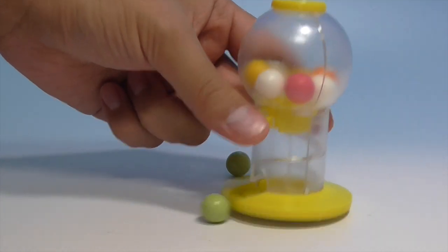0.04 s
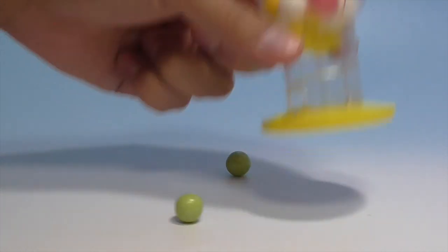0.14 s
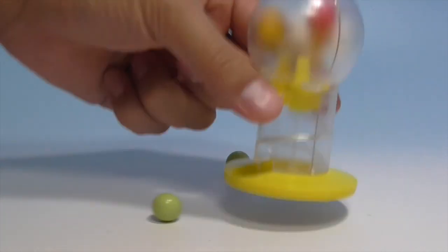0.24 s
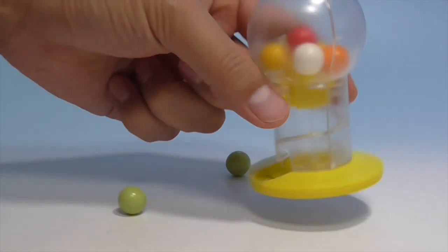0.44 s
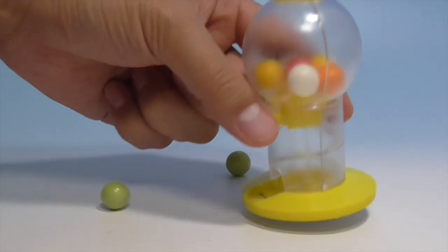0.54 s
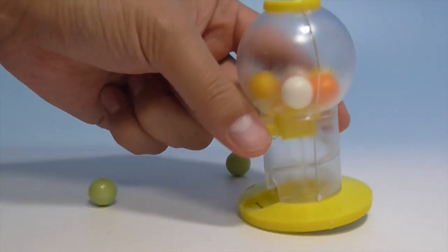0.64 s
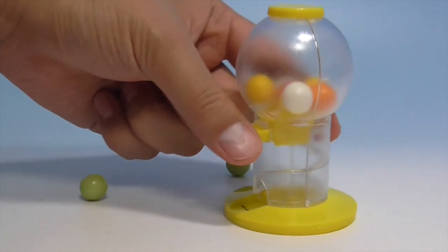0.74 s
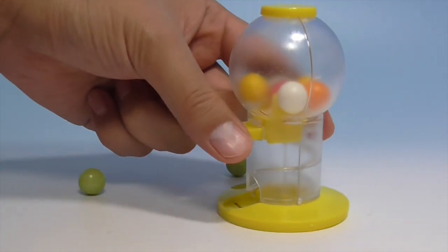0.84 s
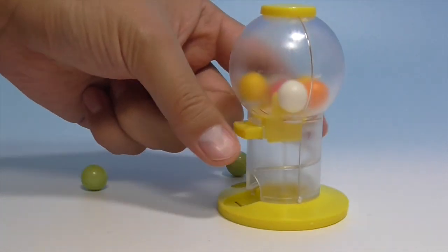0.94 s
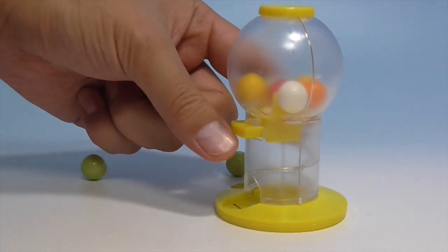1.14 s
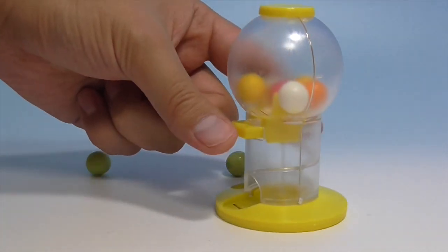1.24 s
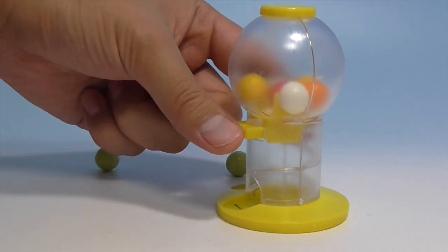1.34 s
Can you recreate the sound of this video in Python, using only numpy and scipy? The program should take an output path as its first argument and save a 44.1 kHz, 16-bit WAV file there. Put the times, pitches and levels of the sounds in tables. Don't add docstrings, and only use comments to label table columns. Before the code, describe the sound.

Brief bright plastic rattle of little balls shaken in a hollow globe, then soft table knocks

```python
import sys
import numpy as np
from scipy import signal
from scipy.fft import rfft, irfft
from scipy.io import wavfile

SR = 44100
rng = np.random.default_rng(int(sys.argv[2]) if len(sys.argv) > 2 else 0)


def wav_out(sig):
    wavfile.write(sys.argv[1], SR, np.round(np.clip(np.atleast_2d(sig).T, -1, 1) * 32767).astype(np.int16))


def rack_gain(trim_db):
    fader = np.asarray(trim_db, float)
    return 10 ** (fader / 20)


N = 61739
TAIL = 8192

# pitch [Hz], level [dB], t60 [s].
GLOBE = [(1683, -2.5, 0.029), (1880, 4, 0.019), (2050, -23.5, 0.03), (3110, -8, 0.069), (3882, 5, 0.017),
         (4012, 0.5, 0.019), (4500, 7, 0.02), (4540, -21.5, 0.013), (1144, -19, .012)]
GLOBE_LOW_HZ = 483


def curve(points, at):
    hz, db = np.array(points, float).T
    return np.interp(np.log(at + 1), np.log(hz), db)


def thin(x, low_hz):
    return signal.sosfilt(signal.butter(N=6, Wn=low_hz, btype="high", fs=SR, output="sos"), x)


def ring(hz, db, t60, turn):
    bloom_s = 0.00041
    t = np.arange(min(TAIL, int(1.2 * t60.max() * SR))) / SR
    sines = np.sin(2 * np.pi * (hz[:, None] * t + turn[:, None]))
    decays = np.exp(-np.log(1000) * t / t60[:, None])
    y = (rack_gain(db)[:, None] * sines * decays).sum(0)
    y = y * (1 - np.exp(-(t / bloom_s) ** 2))
    return y / np.abs(y).max()


def cluster(modes, chance, detune, scatter_db):
    hz, db, t60 = np.repeat(np.array(modes), 3, axis=0).T
    pitch_draw, level_draw = chance[:, :len(hz)]
    return ring(hz * (1 + detune * pitch_draw), db + scatter_db * level_draw, t60, 0 * hz)


def strike(body, noise, rise_s, fall_s):
    t = np.arange(len(noise)) / SR
    scrape = noise * (1 - np.exp(-t / rise_s)) * np.exp(-t / fall_s)
    y = signal.fftconvolve(scrape, body)
    return y / np.abs(y).max()


def add(out, s, y):
    i = int(s * SR)
    out[i:i + len(y)] += y[:N - i]


def globe(chance, own_hz, own_db=12):
    # pitch [Hz], level [dB], t60 [s].
    cavity_modes = [(678.8, -4, 0.096), (756, 8.5, 0.0098)]
    detune, scatter_db = 0.032, 3
    own_t60_s, shell_t60_s = 0.016, 0.007
    draws = chance.reshape(6, -1)
    count = draws.shape[1]
    is_own = np.arange(count) // 3 == len(GLOBE)
    draws = draws * np.where(is_own, 0.3, 1)
    wall = cluster(GLOBE + [(own_hz, own_db, own_t60_s)], draws[:2], detune, scatter_db)
    cavity = cluster(cavity_modes, draws[2:4], detune, scatter_db)
    shell_hz = np.geomspace(5300, 15170, num=count)
    shell_db = np.linspace(0, -4.5, count) + scatter_db * draws[5]
    shell = ring(shell_hz * (1 + detune * draws[4]), shell_db, shell_t60_s + 0 * shell_hz, draws[0])
    return thin(wall, 787), cavity, shell


def knocks():
    # start [s], peak [dB], strongest ring [Hz], cavity bass [dB], shell treble [dB].
    lift_knocks = [(0.1176, -33.5, 1980, -11.5, -35), (0.1349, -44, 1620, 11.5, -43),
                   (0.155, -27.5, 3330, -37, -31.5), (0.164, -29, 3140, -0.5, -37),
                   (0.1853, -24.5, 1790, -2, -8.5), (0.1952, -19, 1830, -3, -35),
                   (0.2031, -11.5, 1950, -29, -12.5), (0.2127, -7, 4500, -12, -18),
                   (0.2544, -32.5, 1980, -2.5, -23), (0.3094, -37, 2030, -28, -17.5),
                   (0.3213, -31, 1890, -28.5, -12.5)]
    shake_knocks = [(0.3431, -32, 4500, -48.5, -20), (0.3541, -17, 3550, -59, -10),
                    (0.3563, -13, 3650, -28, -25), (0.3729, -21.5, 3400, -26.5, -7.5),
                    (0.3881, -9.5, 4800, -49.5, -4), (0.414, -1, 4090, -25.5, -14),
                    (0.4189, -1.5, 5356, -41, -7), (0.4243, -11, 4520, -41.5, 0),
                    (0.4281, -23, 1960, 8, 6.5), (0.4375, -30, 4300, -22, 1.5),
                    (0.452, -9.5, 1880, -33.5, -5), (0.4075, -15.5, 5700, -40.5, -11),
                    (0.5418, -21.5, 4430, -44, -8)]
    tumble_knocks = [(0.5644, -11, 4190, -17, -16.5), (0.5668, -25.5, 1970, -42, 8),
                     (0.5703, -19.5, 4150, -41, 1.5), (0.583, -10, 4040, -55, -10.5),
                     (0.5933, -22, 4530, -55, -10.5), (0.6034, -11, 4160, -16, -6.5),
                     (0.6247, -33, 3730, -37, 6.5), (0.6491, -18, 3930, -45, -14),
                     (0.6649, -16.5, 3930, -42, -15), (0.6838, -14.5, 4440, -24, -11.5),
                     (0.696, -18.5, 3760, -35, -12.5), (0.706, -22, 4060, -38, -20.5),
                     (0.7271, -19.5, 1600, -17, -22), (0.7533, -20.5, 4120, -2.5, -27.5)]
    settle_knocks = [(0.8353, -26.5, 1880, -9, -18), (0.8446, -31, 1830, -29, -34),
                     (0.8534, -26, 1820, -13, -51), (0.8597, -31, 1700, -20, -57),
                     (0.9315, -25, 1760, -9, -17.5), (1.0645, -41.5, 1973, -15.5, -16),
                     (1.078, -35.5, 1670, -20.5, -39.5), (1.2524, -41, 1780, -5.5, -30),
                     (1.263, -33.5, 1890, -38.5, -19.5), (1.2893, -30.5, 1775, -12, -14),
                     (1.2958, -34, 1813, -39.5, -13), (1.3066, -29.5, 1940, -31, -10),
                     (1.3134, -40, 2085, 7.5, -19), (1.3169, -29, 4830, -27, -16),
                     (1.3904, -38, 1810, -11.5, -33.5)]
    ball_db, cavity_db, shell_db = -5, -2, 8.5
    hard = (12, 0.0008)
    soft = (18.5, 0.0023)
    out = np.zeros(N)
    for events, (own_db, contact_s) in ((lift_knocks, hard), (shake_knocks, hard),
                                        (tumble_knocks, hard), (settle_knocks, soft)):
        for s, db, hz, low_db, high_db in events:
            bodies = globe(rng.standard_normal(180), hz, own_db)
            noise = rng.standard_normal(720)
            for body, rel_db in zip(bodies, (0, low_db + cavity_db, high_db + shell_db)):
                hit = strike(body, noise, rise_s=0.0012, fall_s=contact_s)
                add(out, s, rack_gain(db + ball_db + rel_db) * hit)
    return out


def rebounds():
    # start [s], peak [dB], ring [Hz].
    rebound_events = [(.001, -48.5, 700), (.022, -62, 690), (.3645, -30, 1900), (.3745, -37.5, 1900),
                      (.4035, -31, 1600), (.4395, -28, 1850), (.4465, -28, 1950), (.4645, -50.5, 1950),
                      (.4715, -41.5, 1950), (.4785, -37.5, 1950), (.5085, -32, 3900), (.5168, -33, 1850),
                      (.5225, -38, 1750), (.5275, -37, 1850), (.5325, -38.5, 1950), (.557, -41.5, 1750),
                      (.568, -25.5, 1950), (.5735, -35, 1950), (.5795, -36.5, 1900), (.5915, -38, 1900),
                      (.597, -50, 1950), (.6155, -41, 1950), (.838, -37, 2960), (.8545, -45, 2960),
                      (.862, -35.5, 2960), (1.063, -56, 3070), (1.077, -46.5, 3880), (1.262, -47.5, 4900),
                      (.119, -41.5, 3230), (.118, -33, 1980), (.586, -35, 665), (.596, -41, 665),
                      (.607, -28.5, 665), (.685, -33, 665), (.696, -37, 665), (.868, -47, 1850),
                      (.877, -36.5, 2070), (.887, -47.5, 1790), (.9, -47, 1820), (.914, -41.5, 1716),
                      (.884, -50, 4980), (.944, -36, 2000), (.955, -41, 2040), (.967, -41.5, 2160),
                      (1.086, -49.5, 1880), (1.272, -53, 1800), (1.281, -45, 1730), (1.31, -31.5, 6800),
                      (1.298, -34.5, 3030), (0.111, -45.5, 700), (0.174, -36, 3200), (.2, -25, 3200),
                      (.348, -32, 3300), (0.379, -31.5, 3300)]
    ring_t60_s, rest_db = 0.022, -17.5
    out = np.zeros(N)
    for s, db, hz in rebound_events:
        modes = [(hz, 0, ring_t60_s)] + [(f, d + rest_db, t60) for f, d, t60 in GLOBE]
        body = cluster(modes, rng.standard_normal((2, 30)), detune=0.012, scatter_db=1.9)
        hit = strike(body, rng.standard_normal(440), rise_s=0.0002, fall_s=0.0017)
        add(out, s, rack_gain(db) * hit)
    return out


def ticks():
    # time [s], tick level [dB].
    stir = [(0, -53.5), (0.098, -83), (0.112, -61.5), (0.206, -42), (0.296, -64.5), (0.344, -58),
            (0.352, -38), (0.426, -37.5), (0.501, -64.5), (0.572, -40), (.65, -48.5), (0.747, -42.5),
            (0.819, -64), (.90, -62), (.95, -56.5), (1.02, -77.5), (1.241, -87.5), (1.318, -48)]
    still_db = -103.5
    rate, spots = 5000, 6
    spread_db = 2.6
    s, db = np.array(stir + [(N / SR, still_db)]).T
    db = np.interp(np.arange(N) / SR, s, db)
    calm_db = db.max() - db
    cavity_gain = rack_gain(-16 + 0.42 * calm_db)
    shell_gain = rack_gain(0.5 - 0.49 * calm_db)
    out = np.zeros(N)
    for spot in range(spots):
        struck = rng.random(N) < rate / spots / SR
        hits = struck * rack_gain(spread_db * rng.exponential(size=N)) * rng.standard_normal(N)
        hits = hits / np.sqrt(rate / SR) / rack_gain(spread_db) * rack_gain(db)
        bodies = globe(rng.standard_normal(180), GLOBE[spot + 1][0])
        wall, cavity, shell = (signal.fftconvolve(hits, b / np.sqrt(np.sum(b ** 2)))[:N] for b in bodies)
        out = out + wall + cavity_gain * cavity + shell_gain * shell
    return out


def base_thuds():
    # start [s], peak [dB], rocking time [s].
    thuds = [
        (.731, -37.5, 0.016),
        (.785, -52, 0.021),
        (.825, -58.5, 0.019),
        (.875, -57, 0.041),
        (.928, -40, 0.031),
        (1.0, -56.5, 0.026),
        (1.041, -59.5, 0.031),
        (1.111, -65.5, 0.049),
    ]
    # pitch [Hz], level under front edge [dB], under back edge [dB], t60 [s].
    table_modes = [(183, -13, -17, 0.039), (252.2, -21, -5.5, 0.054), (323.7, 0.5, -14, 0.055),
                   (448.2, 4, -3.5, 0.044), (563.5, 0.5, 1, 0.06), (665, 3, -9, 0.078),
                   (750, 3, -0.5, 0.05), (867, -1, -8, 0.026), (974, 3.5, 2, 0.036),
                   (1131, -2.5, -11, 0.037), (1377, 0.5, -15.5, 0.034)]
    landings, back_edge_s = (0, 4), 0.9
    late_cycles = 4.0
    out = np.zeros(N)
    for i, (s, peak_db, rock_s) in enumerate(thuds):
        noise = rng.standard_normal(8000)
        for k, (hz, front_db, back_db, t60) in enumerate(table_modes):
            db = back_db if s > back_edge_s else front_db
            if i not in landings:
                db += 4.5 * noise[k]
            chance = noise[6 * k:6 * k + 6].reshape(2, 3)
            body = cluster([(hz, 0, t60)], chance, detune=0.022, scatter_db=3.3)
            hit = strike(body, noise, rise_s=0.0074, fall_s=rock_s)
            add(out, s + late_cycles / hz, rack_gain(peak_db + db) * hit)
    return thin(out, 190)


def lever():
    # start [s], peak [dB].
    clicks = [
        (.825, -42.5),
        (.881, -33),
        (.891, -38.5),
        (0.897, -51),
        (.906, -48),
        (0.914, -73),
        (0.931, -29.5),
        (1.231, -80),
    ]
    # pitch [Hz], level [dB], t60 [s].
    lever_modes = [(3000, -8, .03), (4300, -8, .025), (4880, -4, .035), (6720, 0, .035), (9730, -8, .03),
                   (12500, -13, .025)]
    spring_modes = [(4366, -14, .3), (6702, -2, .2), (7058, -7, .11), (8107, -5, .17), (8468, -4, .13),
                    (10930, -3, .1), (11410, -2, .2)]
    pluck_s, pluck_db = 1.1623, -47
    out = np.zeros(N)
    for s, peak_db in clicks:
        noise = rng.standard_normal(400)
        body = cluster(lever_modes, noise[:60].reshape(2, -1), detune=0.012, scatter_db=2)
        add(out, s, rack_gain(peak_db) * strike(body, noise, rise_s=0.0004, fall_s=0.0015))
    spring = cluster(spring_modes, rng.standard_normal((2, 30)), detune=0.006, scatter_db=0.55)
    add(out, pluck_s, rack_gain(pluck_db) * spring)
    return thin(out, GLOBE_LOW_HZ)


def jolts():
    # start [s], peak [dB], push time [s].
    jolt_events = [(.1955, -40, .00012), (0.204, -38, .00012), (.2135, -44, .00025), (.372, -66, .0015),
                   (.389, -27, .00013), (0.4145, -27, .00017), (.42, -36, .0005), (.453, -30, .00017),
                   (0.565, -66, 0.001), (.9350, -70, 0.003)]
    out = np.zeros(N)
    for s, db, push_s in jolt_events:
        t = np.arange(TAIL) / SR / push_s
        add(out, s, rack_gain(db) * t * (2 - t) * np.exp(1 - t))
    return out


def hush():
    # frequency [Hz], density [dB per Hz].
    hush_colour = [(30, -31), (120, -2), (600, 4), (1900, -6.5), (4500, -11.5), (16000, -22)]
    f = np.fft.rfftfreq(N, 1 / SR)
    x = irfft(rfft(rng.standard_normal((3, N))) * rack_gain(curve(hush_colour, f)), N)
    return rack_gain(-71) * (x[0] + 1.7 * x[1:]) / x.std()


def ducking(near):
    depth, recover_s = 93, 0.2
    k = 1 / recover_s / SR
    return 1 + depth * signal.lfilter([k], [1, k - 1], np.abs(near))


def room(near):
    t60_s, smear_t60_s = 0.15, 0.0057
    t = np.arange(2 * TAIL) / SR
    tail = rng.standard_normal((4, len(t))) * np.exp(-np.log(1000) * t / t60_s) * (t > 0.004)
    smear = tail[3] * np.exp(-np.log(1000) * t / smear_t60_s)
    width, top_hz = 0.61, 7240
    tail = signal.lfilter(*signal.butter(1, top_hz, fs=SR), tail[0] + width * tail[1:3])
    tail = tail / np.sqrt(np.sum(tail[0] ** 2))
    wet = near + rack_gain(-13) * signal.fftconvolve(near[None], tail)[:, :N]
    return wet, smear / np.sqrt(np.sum(smear ** 2))


def ports(wet, smear):
    # frequency [Hz], left minus right [dB].
    port_db = [(60, 5), (150, -6.5), (1200, -1.1), (2500, -0.2), (8000, -1.5)]
    # frequency [Hz], level [dB].
    apart_db = [(60, -6.5), (250, -5), (500, -8), (1000, -21), (4000, -25), (12000, -8)]
    f, sign = np.fft.rfftfreq(N, 1 / SR), np.array([[1], [-1]])
    apart = rack_gain(curve(apart_db, f)) * rfft(smear, N)
    balance = rack_gain(sign * curve(port_db, f) / 2)
    return irfft(rfft(wet) * balance * (1 + sign * apart), N)


def scene():
    toy = thin(knocks() + rebounds() + ticks(), GLOBE_LOW_HZ)
    near = toy + base_thuds() + lever() + jolts()
    return ports(*room(near)) + hush() / ducking(near)


def band_limit(x):
    return signal.sosfilt(signal.butter(12, 16810, fs=SR, output="sos"), x)


def record(dry):
    dry = signal.sosfilt(signal.butter(N=2, Wn=[45, 14500], btype="band", fs=SR, output="sos"), dry)
    ceiling = 1.1
    mix = ceiling * np.tanh(dry / ceiling)
    return band_limit(mix)


dry = scene()
out = record(dry)
wav_out(out)
```